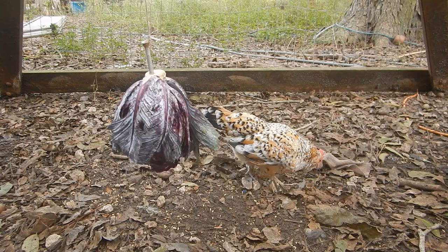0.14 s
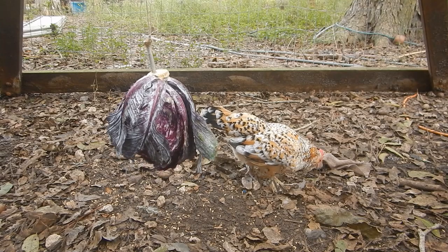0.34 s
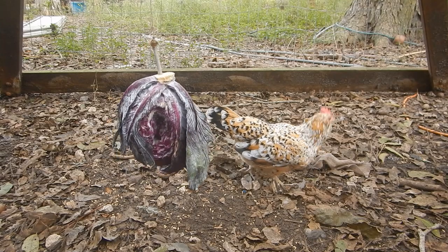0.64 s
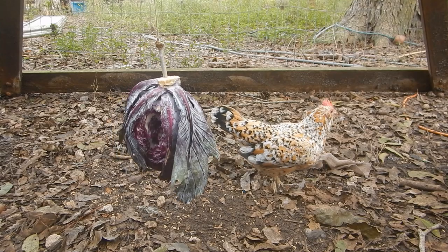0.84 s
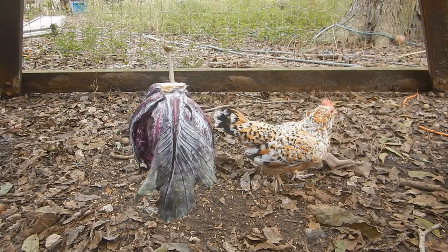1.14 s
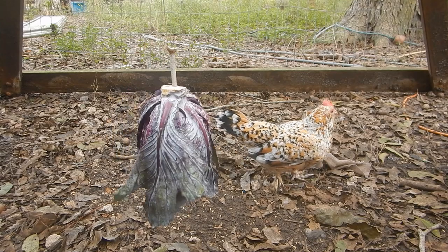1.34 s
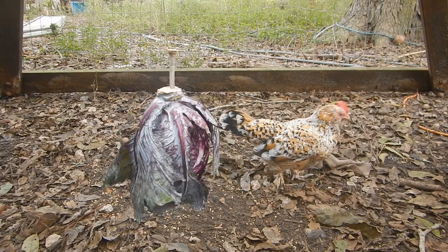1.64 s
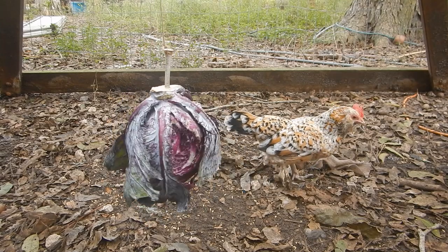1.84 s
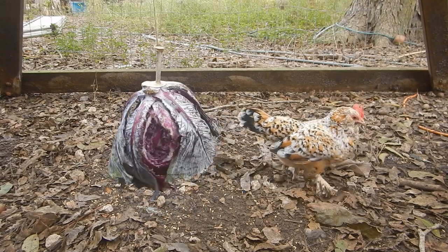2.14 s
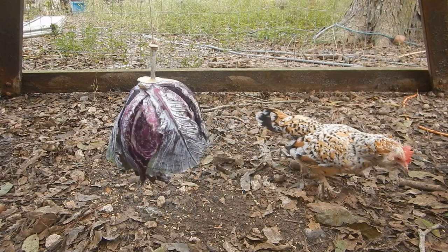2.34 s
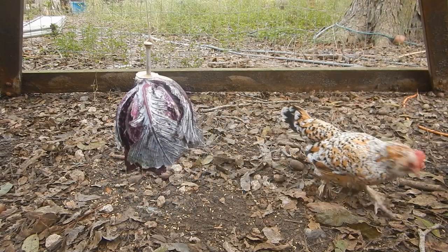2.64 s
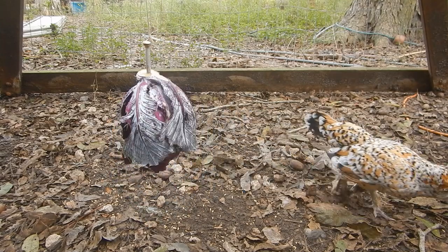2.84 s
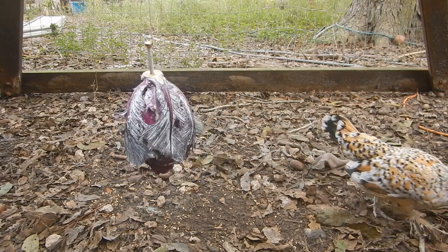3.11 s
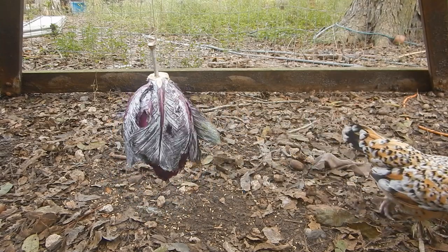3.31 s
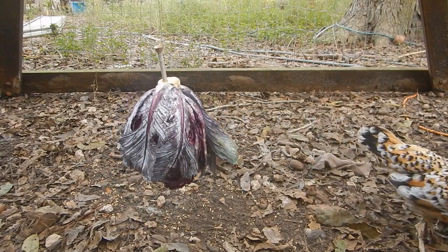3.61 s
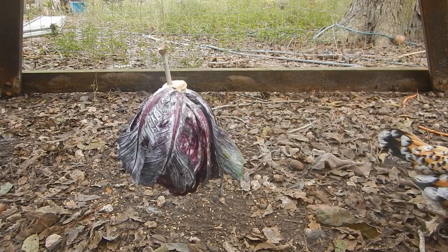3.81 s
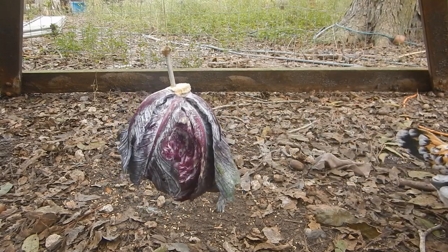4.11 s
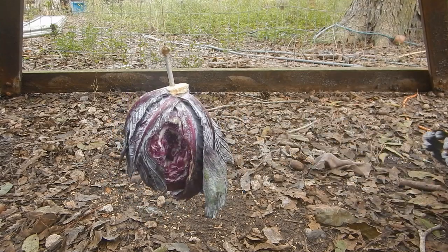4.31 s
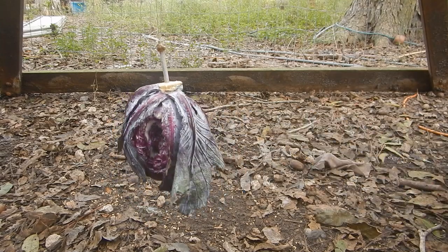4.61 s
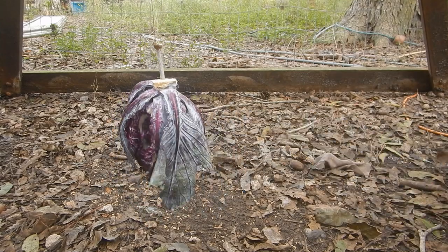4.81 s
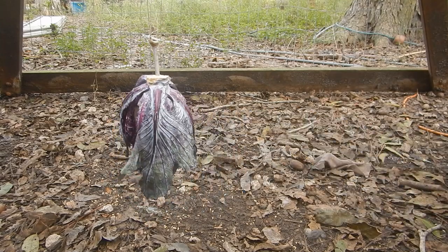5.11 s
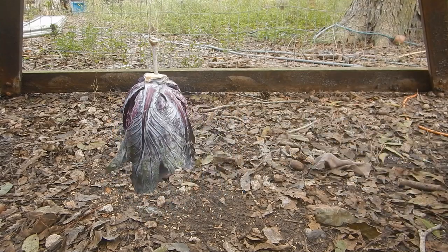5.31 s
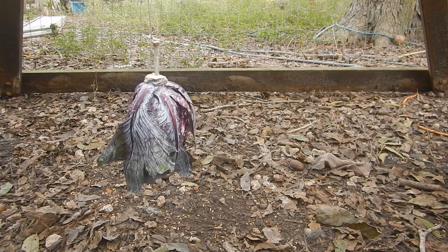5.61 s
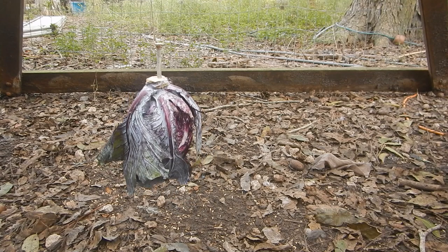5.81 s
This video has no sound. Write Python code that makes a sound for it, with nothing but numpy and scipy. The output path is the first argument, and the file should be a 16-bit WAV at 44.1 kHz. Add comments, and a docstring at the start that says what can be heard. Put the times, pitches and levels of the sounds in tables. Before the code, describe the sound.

Outdoors in a leafy yard, a distant engine hums low under faint hiss. A hen's light steps rustle dry leaves with small snaps; far birds cry, whistle and trill in the first three seconds. A sharp snap comes left of centre at 3.4 seconds, a short peep follows, and from 4.6 seconds loud scratching rakes leaves and soil close on the right.

```python
"""Over the hum of a distant engine and a faint hiss, dry leaf litter rustles, mostly under a hen's light steps.
Leaves and twigs snap (decaying noise bursts) among crackling litter (many short flake resonances).
Far birds whistle, cry and trill (gliding phases, shaped noise); the hen peeps (a harmonic series).
Towards the end the scratching comes close on the right, in loud strokes that reach the soil."""
import sys
import numpy as np
from scipy import signal
from scipy.fft import rfft, irfft
from scipy.io import wavfile

SR = 44100
rng = np.random.default_rng(int(sys.argv[2]) if len(sys.argv) > 2 else 0)


def to_wav(sig):
    """Store sig (one row per channel, or 1-D mono) as 16-bit WAV at the path in sys.argv[1].

    Samples outside -1..1 are clipped; the rate is SR.
    """
    pcm = np.clip(np.atleast_2d(sig), -1, 1) * 32767
    pcm = np.round(pcm).astype(np.int16)
    wavfile.write(sys.argv[1], SR, pcm.T)  # frames by channels


N = 262395
T = np.arange(N) / SR  # time, s
HZ = np.fft.rfftfreq(N, 1 / SR)  # frequency of each spectral bin, Hz


def gain_of(db):
    """Level to amplitude: 20 dB is a factor of ten."""
    return 10 ** (np.asarray(db) / 20)


def evened(x):
    """Normalisation of the signal energy: scales to an rms of one."""
    return x / np.sqrt(np.mean(x ** 2) + 1e-20)


def read(points, hz):
    """Interpolation on a logarithmic frequency axis, close to the ear's scale of pitch."""
    f, value = np.transpose(points)
    return np.interp(np.log(hz + 1), np.log(f + 1), value)


def add(mix, s, sound):
    """Superposition: adds a sound to the mix at time s."""
    part = mix[:, max(round(s * SR), 0):][:, :sound.shape[-1]]
    part += sound[:, :part.shape[-1]]


def panned(side_db):
    """Interaural level difference: left and right gains whose mean is one."""
    pair = gain_of(np.array([np.atleast_1d(side_db), -np.atleast_1d(side_db)]) / 2)
    return pair / pair.mean(0)


def colour(x, points, side=((1, 0), (SR, 0)), size=2048):
    """Minimum-phase filtering: folding the cepstrum makes a causal filter of given spectrum and balance."""
    hz = np.fft.rfftfreq(size, 1 / SR)
    magnitude = gain_of(read(points, hz)) * panned(read(side, hz))
    cepstrum = irfft(np.log(magnitude))
    cepstrum[:, 1:size // 2] *= 2
    cepstrum[:, size // 2 + 1:] = 0
    impulse_response = irfft(np.exp(rfft(cepstrum)))
    pair = np.atleast_2d(x) * np.ones((2, 1))
    return signal.oaconvolve(pair, impulse_response, axes=1)[:, :x.shape[-1]]


def drift(rate, count=24):
    """Superposed sines of random phase, up to the given rate in Hz, give an irregular wandering of rms one."""
    t = T[::64]
    waves = sum(np.sin(2 * np.pi * (f * t + rng.random())) for f in np.geomspace(rate / 10, rate, count))
    return np.interp(T, t, evened(waves))


def echoes(x, t60, count=300):
    """Diffuse reflection: random taps, different at each ear, fall by 60 dB in t60 seconds."""
    n = int(max(t60, .005) * SR)
    at = rng.random((2, count))  # delay as a share of t60
    taps = np.zeros((2, n))
    strength = rng.choice([-1., 1.], at.shape) * np.exp(-np.log(1000) * at)
    np.put_along_axis(taps, (at * n).astype(int), strength, 1)
    return signal.oaconvolve(x[None], taps / np.linalg.norm(taps[0]), axes=1)[:, :len(x)]


def crackle(per_s, spread_db, likeness, count=12):
    """Impulse excitation: random tiny fractures of uneven size each ring a leaf flake for about a cycle."""
    fracture = rng.random(N) < per_s / SR
    size_db = spread_db * np.minimum(rng.exponential(1, N), 4.5)
    size = gain_of(size_db) * rng.choice([-1, 1], N) * fracture
    flake = rng.integers(0, count, N)
    # a likeness of 1 makes both ears equal
    ears = 1 + (1 - min(likeness, 1)) * rng.standard_normal(N) * np.array([[1], [-1]])
    t, out = T[:256], np.zeros((2, N))
    for k, hz in enumerate(np.geomspace(900, 14000, count)):
        ring = np.exp(-t * hz / 0.99) * np.cos(2 * np.pi * hz * t)
        out += signal.oaconvolve(size * ears * (flake == k), ring[None] * hz, axes=1)[:, :N]
    return evened(out)


def envelope(events, rise_share, fall_db_per_s):
    """Addition of powers: each event rises over a share of its length, holds, then dies away."""
    power = np.zeros(N)
    for start, length, level_db in events:
        age = T - start
        rise = np.clip(age / max(rise_share * length, 1 / SR), 0, 1)
        fall_db = fall_db_per_s * np.clip(age - length, 0, 1)
        power += (rise * gain_of(level_db - fall_db)) ** 2
    return np.sqrt(power)


def glide(length, start_hz, end_hz, jitter):
    """Frequency modulation: the phase of a sliding, unsteady note is the running sum of its frequency."""
    n = int(length * SR)
    hz = np.linspace(start_hz, end_hz, n) * (1 + jitter * drift(395)[:n])
    return 2 * np.pi * np.cumsum(hz) / SR


def machine():
    """Beating of harmonics: a big far engine idles at multiples of one slow cycle, over filtered-noise rumble."""
    # low noise of the engine: columns f/Hz, relative level/dB
    rumble_spectrum = [(20, -16), (38, -6.5), (72, 0.5), (84, -5), (87, 13), (91, 4), (135, -4),
                       (160, -3.5), (200, -14), (300, -35.5), (500, -29.5)]
    # tones of the engine: columns multiple of its cycle, mean level/dB
    engine_orders = [(6, -68.5), (12, -52.5), (14, -59.5), (15, -52.5), (16, -58.5), (17, -67.5),
                     (18, -47.5), (21, -72), (24, -68.5), (27, -76), (30, -63), (36, -82)]
    cycle_hz, rumble_db = 6.267, -48.5
    rumble_gain = gain_of(read(rumble_spectrum, HZ) - 60 * (HZ > 600))
    rumble = evened(irfft(rfft(rng.standard_normal((3, N))) * rumble_gain, N))
    rumble_pair = rumble[0] + 0.39 * rumble[1:]  # a shared part and one for each ear
    turn = 2 * np.pi * np.cumsum(cycle_hz * (1 + 0.0026 * drift(1.87))) / SR
    tones = np.zeros(N)
    for order, db in engine_orders:
        phase = order * turn + 2 * np.pi * rng.random() + .2 * drift(3)
        tones += gain_of(db + drift(2)) * evened(np.sin(phase))
    return (gain_of(rumble_db) * rumble_pair + tones) * panned(side_db=-3.0)


def air():
    """Partial coherence: the even hiss of the open yard mixes shared and separate noise at the ears."""
    # hiss: columns f/Hz, relative level/dB
    hiss_spectrum = [(120, -19), (200, 0), (288, -4.5), (564, -11), (1260, -9), (2090, -16), (2510, -16.5),
                     (2900, -18.5), (5010, -16.5), (6240, -17), (7220, -13), (8200, -13), (10200, -34.5),
                     (11800, -28.5), (15500, -36)]
    # likeness of the ears: columns f/Hz, coherence (0-1)
    hiss_coherence = [(60, 0.36), (130, 0.29), (290, 0.58), (640, 0.38), (1410, 0.52), (3100, 0.55),
                      (6820, 0.33), (15000, 0.19)]
    # balance of the hiss: columns f/Hz, left minus right level/dB
    hiss_balance = [(60, 4), (110, -8), (200, -3.5), (380, -2.5), (700, -2), (1290, -5), (2380, 2.5),
                    (4400, 2), (8120, 0), (15000, -1)]
    a, b = rfft(rng.standard_normal((2, N)))
    same = np.clip(read(hiss_coherence, HZ), 0, 1)
    pair = irfft(np.array([a, same * a + np.sqrt(1 - same ** 2) * b]), N)
    return gain_of(-53.5 + 0.084 * drift(2.53)) * evened(colour(pair, hiss_spectrum, hiss_balance))


def trill(hz=6300, width_hz=450):
    """Amplitude modulation of band-limited noise: a thin, high, fluttering trill from far off, in phrases."""
    # phrases: columns t/s, length/s, level/dB
    phrase_events = [(1.37, .18, -62), (1.655, 0.11, -55.5), (1.835, 0.17, -57.5), (2.02, 0.2, -56.5),
                     (2.22, .145, -53), (2.405, 0.17, -54.5), (2.63, 0.11, -53.5), (2.76, .06, -65)]
    band = irfft(rfft(rng.standard_normal((2, N))) * np.exp(-((HZ - hz) / width_hz) ** 2), N)
    flutter = gain_of(2.0 * drift(60))
    return evened(band * flutter) * envelope(phrase_events, rise_share=0.097, fall_db_per_s=248)


def birds():
    """Tone against noise: far whistles glide, hoarse cries break into a rasp; trees blur them by reflection."""
    # whistles of a far songbird: columns t/s, length/s, start f/Hz, end f/Hz, level/dB
    whistle_notes = [(0.10, .17, 3150, 3180, -65.5), (1.53, .04, 5350, 5480, -63),
                     (1.77, .04, 2620, 2620, -62), (1.81, .05, 2000, 2300, -63),
                     (1.945, .06, 2720, 2800, -58), (2.12, .05, 2700, 2750, -56),
                     (2.295, .06, 2760, 2720, -54), (2.47, .12, 2760, 2740, -54),
                     (2.66, .09, 2710, 2750, -57)]
    # hoarse falling cries of a far bird: columns t/s, length/s, start f/Hz, end f/Hz, level/dB, rasp level/dB
    cry_notes = [(0.599, 0.031, 1583, 1294, -51, -61), (0.818, 0.048, 1643, 1306, -52.5, -61),
                 (1.37, .045, 1650, 1232, -49, -54.5), (1.652, 0.039, 1614, 1480, -50.5, -57)]
    # filter of the cries: columns f/Hz, gain/dB
    cry_spectrum = [(900, -9), (1400, -1), (2100, -12), (2900, -6), (4400, -7), (6200, -11), (8000, -31)]
    # rasping ends of the cries: columns f/Hz, relative level/dB
    rasp_spectrum = [(900, -10), (1600, -6), (2100, 2.5), (2900, 3), (3400, -10), (5000, -11), (8000, -36)]
    song, cries, rasps = np.zeros((3, 1, N))
    for s, length, start_hz, end_hz, level_db in whistle_notes:
        turn = glide(length, start_hz, end_hz, jitter=.02)
        note = gain_of(level_db) * np.sin(turn) * signal.windows.tukey(len(turn), .5)
        add(song, s, note[None])
    for s, length, start_hz, end_hz, level_db, rasp_db in cry_notes:
        turn = glide(length, start_hz, end_hz, jitter=.042)
        breath = 1.1 * rng.standard_normal(len(turn))
        cry = sum(np.sin(k * turn) for k in range(1, 5)) + breath
        add(cries, s, (gain_of(level_db) * cry * signal.windows.tukey(len(turn), .5))[None])
        # the rasp starts halfway through the cry and peaks 48 ms later
        age = np.maximum(T - s - length / 2, 0) / .048
        rasps += gain_of(rasp_db) * age * np.exp(1 - age)
    rough_noise = rng.standard_normal(N) * gain_of(1.8 * drift(120))
    rasp = evened(colour(rough_noise, rasp_spectrum)[0]) * rasps[0]
    calls = song[0] + colour(cries, cry_spectrum)[0] + rasp
    return calls * panned(side_db=-2) + gain_of(-3) * echoes(calls, t60=.5, count=900)


def peeps():
    """Source and filter: harmonics of a gliding, clear or rough voice grow with effort and meet the throat."""
    # the hen's peeps, one list each: columns t/s, f/Hz, level/dB, roughness (0-1)
    peep_tracks = [
        [(3.855, 679, -56, 0.2), (3.876, 690, -53, 0), (3.881, 897, -46, .05), (3.888, 933, -39, 0.14),
         (3.894, 1010, -46, .05), (3.900, 1160, -60, .05), (3.906, 1170, -64, .2)],
        [(5.645, 786, -62, .3), (5.675, 856, -45, .3), (5.700, 1123, -47, 0.7), (5.725, 824, -46, .6)],
        [(5.795, 760, -54, 0.46), (5.81, 798, -45, 0.6), (5.817, 910, -42, 0.5), (5.828, 747, -50, 0.8),
         (5.85, 780, -59, 1)],
    ]
    # throat resonance: columns f/Hz, gain/dB
    throat_gain = [(500, 5), (700, -1), (950, -6.5), (1400, 4), (1900, -1), (2350, 12), (2800, -14),
                   (3400, -19), (6000, -50)]
    # below soft_db each higher harmonic loses a further so many dB per dB
    soft_db, soft_dulling = -45.5, 0.88
    voice = np.zeros(N)
    for rows in peep_tracks:
        s, *columns = np.transpose(rows)
        on = (T > s[0]) & (T < s[-1])
        hz, level_db, rough = (np.interp(T[on], s, column) for column in columns)
        turn = 2 * np.pi * np.cumsum(hz * (1 + .08 * rough * drift(330)[on])) / SR
        loudest_db = np.maximum.accumulate(level_db)  # once open, the beak stays open
        dull_db = soft_dulling * np.minimum(loudest_db - soft_db, 0)
        stack = np.zeros(on.sum())
        for k in range(1, 5):
            stack += gain_of(read(throat_gain, k * hz) + (k - 1) * dull_db) * np.sin(k * turn)
        loudness = gain_of(level_db + 2.5 * rough * drift(300)[on])
        voice[on] += stack * loudness * signal.windows.tukey(on.sum(), .15)
    return voice * panned(side_db=-1.0) + gain_of(-8) * echoes(voice, t60=0.25)


def stirring():
    """Granular noise: a dense run of small fractures swells and dies, mostly as light steps shift the leaves."""
    # light steps, and at 3.39 s the short leaf rustle that trails a loud snap,
    # and at 0.60 s a faint breathy noise with the bird's cry: columns t/s, length/s, level/dB
    rustle_events = [(0.045, 0.044, -51.5), (0.30, 0.019, -58.5), (0.60, 0.071, -58), (0.78, 0.019, -54.5),
                     (0.825, 0.034, -49), (0.945, .025, -51), (1.048, 0.017, -50), (1.162, 0.0067, -51.5),
                     (1.29, .13, -58.5), (1.66, 0.091, -51.5), (1.85, .14, -52.5), (2.02, 0.077, -47.5),
                     (2.23, .13, -48.5), (2.41, 0.066, -48), (2.50, 0.074, -48), (2.638, 0.026, -48.5),
                     (2.68, 0.19, -52.5), (2.985, 0.089, -49), (3.11, 0.22, -51.5), (3.335, 0.05, -46.5),
                     (3.39, 0.0085, -36.5), (3.515, 0.021, -46), (3.57, 0.086, -56), (3.73, 0.028, -53.5),
                     (3.80, 0.091, -52), (3.925, 0.012, -49), (3.97, 0.023, -52.5), (4.04, 0.043, -56.5),
                     (4.257, 0.054, -51), (4.535, 0.11, -56.5)]
    # rustle of the leaves: columns f/Hz, relative level/dB
    rustle_spectrum = [(800, -15.5), (2000, -12), (3500, -14), (5000, -10.5), (6300, -3.5), (7400, -8.5),
                       (9000, -18.5), (10500, -31.5), (12000, -32), (15500, -32)]
    # balance of the rustle: columns f/Hz, left minus right level/dB
    rustle_balance = [(600, -3.5), (2500, -7), (5000, -0.5), (15000, -2)]
    grains = crackle(per_s=2200, spread_db=2.0, likeness=1.0)
    scattered = grains + gain_of(3) * echoes(grains[0], t60=.05)
    leaves = evened(colour(scattered, rustle_spectrum, rustle_balance))
    rustling = envelope(rustle_events, rise_share=0.11, fall_db_per_s=307)
    return leaves * np.hypot(rustling, gain_of(-60))  # the litter is never quite still


def snaps():
    """Sudden release of strain: a breaking stem bursts, knocks the ground and shakes the leaves around it."""
    # snapping leaves and twigs: columns t/s, level/dB, dull knock/dB, fine treble/dB, left minus right level/dB
    snap_events = [(0.273, -42.5, -1, -25, -3), (0.6472, -39, -5.5, -9, 5.5), (0.7342, -29.5, 4, -20, 3),
                   (0.7844, -38.5, -9, 2, -3), (2.0308, -37, 7, -9, -3), (2.0582, -33.5, 12, -15, 0),
                   (2.0753, -33.5, 1, -11, -3), (2.3193, -33.5, 3, 0, -3), (2.5892, -40.5, 10, -8, 12),
                   (2.6475, -35.5, 4, -16, -4), (2.8554, -35.5, -12, -1, -3), (3.1475, -34, -3, -6, -2),
                   (3.1812, -34.5, -9, -10, -2), (3.2016, -39, -13, 5, 1), (3.2445, -37, -12.5, -4, 1),
                   (3.3428, -35.5, 1, -9, 7), (3.394, -19, -4, -5.5, 10), (3.3987, -26, 2, 5, -6),
                   (3.4936, -38, -10.5, -5, 0), (4.0378, -37.5, -8.5, -2, -3), (4.3206, -40, -17, -5, -7),
                   (4.6799, -33, 14, 5, -5), (4.749, -31, -14, -8, -12), (4.7666, -26, 7, 5, -6),
                   (4.788, -38, 8, -16, -10), (5.021, -36, 19, -6, -15), (5.0525, -32, -15, -15, -13),
                   (5.196, -27.5, -17, -14, -9.5), (5.247, -28.5, -6, -1, -7), (5.3827, -30, 3, -2, -5),
                   (5.4454, -32, 4.5, -10, 10), (5.5976, -29.5, 2, -2, -6.5), (5.6281, -34, -2.5, 10, 3),
                   (5.7094, -24, -14, 1, -6), (5.861, -29, 0, -26, -6), (5.89, -19, -5, -19, -10)]
    # burst of the fibres: columns f/Hz, relative level/dB
    crack_spectrum = [(120, -47), (400, -13), (1000, -19.5), (2000, -10), (4000, -6.5), (5800, -2),
                      (7400, -3), (8700, -4), (10500, -20), (12000, -14), (15500, -31)]
    out = np.zeros((2, N))
    breaking = np.exp(-T[:4096] / 0.0015)  # the fibres give way within about 1.5 ms
    for s, level_db, knock_db, treble_db, side_db in snap_events:
        fibres = rng.standard_normal((3, len(breaking))) * breaking
        burst = fibres[0] + .4 * fibres[1:] + gain_of(-6) * echoes(fibres[0], t60=.045)
        # thick stems sound dull, thin ones bright
        stiffness = [(2200, knock_db), (4000, 0), (6500, 0), (9000, treble_db), (13000, treble_db)]
        snap = evened(colour(colour(burst, crack_spectrum), stiffness)) * np.sqrt(np.mean(breaking ** 2))
        add(out, s, gain_of(level_db) * snap * panned(side_db))
    return out


def scratching():
    """Fracture and friction: claws rake dense clumps of leaves and scrape the soil beneath."""
    # strokes of the claws, close by: columns t/s, length/s, leaf level/dB, soil level/dB
    stroke_events = [(4.637, .014, -47.5, -59), (4.675, 0.044, -35.5, -51), (4.741, 0.044, -30, -48),
                     (4.83, 0.045, -44.5, -63), (4.882, 0.072, -39, -53.5), (4.981, 0.087, -39.5, -61),
                     (5.103, 0.13, -46, -61), (5.217, 0.093, -40, -58.5), (5.306, 0.11, -39.5, -55),
                     (5.429, 0.085, -35.5, -51), (5.511, 0.099, -43, -58), (5.612, 0.084, -33.5, -55),
                     (5.635, 0.088, -26, -46), (5.737, 0.12, -41, -54.5), (5.852, 0.039, -34.5, -64),
                     (5.877, 0.056, -27.5, -36.5)]
    # raked leaves: columns f/Hz, relative level/dB
    raked_spectrum = [(600, -23.5), (1300, -16.5), (2000, -7), (3200, -7.5), (4200, -7.5), (6300, 1),
                      (7400, -1.5), (8700, -6), (10000, -17.5), (11000, -36), (11900, -17.5), (13800, -41),
                      (16000, -37)]
    # scraped soil: columns f/Hz, relative level/dB
    soil_spectrum = [(120, -26), (350, 2), (550, 5), (900, 2.5), (1400, 2), (2200, 1.5), (4000, -31)]
    # balance of leaves and soil: columns f/Hz, left minus right level/dB
    stroke_balance = [(300, -4.5), (1000, -2), (2300, -4), (3300, -4.5), (4900, -8.5), (5700, -0.5),
                      (6400, -20), (7150, -18), (7700, -4), (8700, 1), (10000, -8), (11800, 0), (12700, 15),
                      (13600, -10)]
    # share of a stroke spent digging in; how fast the flung leaves come to rest, dB/s
    dig_share, settle_db_per_s = 0.34, 358
    start, length, leaf_db, soil_db = np.transpose(stroke_events)
    raking = envelope(zip(start, length, leaf_db), dig_share, settle_db_per_s)
    scraping = envelope(zip(start, length, soil_db), dig_share, settle_db_per_s)
    # a light stroke breaks separate flakes, a hard one crushes many at once
    crushed = np.clip((20 * np.log10(raking + 1e-9) + 44) / 16, 0, 1)
    separate_flakes = crackle(per_s=2800, spread_db=3.5, likeness=.65)
    crushed_flakes = crackle(per_s=6000, spread_db=3, likeness=.65)
    grains = np.sqrt(1 - crushed) * separate_flakes + np.sqrt(crushed) * crushed_flakes
    scattered = grains + gain_of(-7) * echoes(grains[0], t60=.04)
    leaves = evened(colour(scattered * gain_of(1.7 * drift(130)), raked_spectrum, stroke_balance))
    grit = rng.standard_normal(N) * gain_of(2 * drift(150))
    scattered_grit = grit + gain_of(-6.0) * echoes(grit, t60=0.036)
    soil = evened(colour(scattered_grit, soil_spectrum, stroke_balance))
    return leaves * raking + soil * scraping


def scene():
    """Linear superposition of everything in and around the run."""
    background = machine() + air() + trill() + birds()
    foreground = peeps() + stirring() + snaps() + scratching()
    return background + foreground


def record(dry):
    """Resonance and delay: the microphone port shapes the treble, the right lags a sample, the band is limited."""
    # microphone port: columns f/Hz, width/Hz, gain/dB
    port_peaks = [(6180, 870, 5), (7253, 620, -13), (8106, 310, 7)]
    hz = np.arange(0, SR / 2, 20)
    port_db = sum(db / (1 + (2 * (hz - f) / width) ** 2) for f, width, db in port_peaks)
    ported = colour(dry, np.column_stack([hz, port_db]))
    left, right = signal.lfilter(*signal.iirnotch(2535, 11, SR), ported)  # notch: f/Hz, Q
    heard = np.array([left, np.append(0, right[:-1])])
    low_pass = signal.firwin(511, 15820, window=("kaiser", 9), fs=SR)  # cutoff in Hz
    return signal.oaconvolve(heard, low_pass[None], "same")


dry = scene()
out = record(dry)
to_wav(out)
```